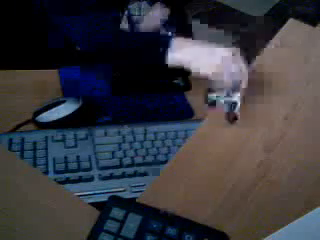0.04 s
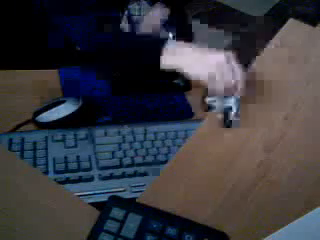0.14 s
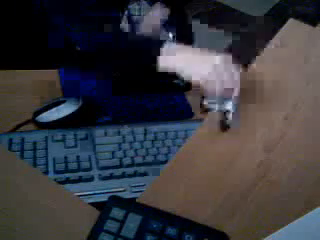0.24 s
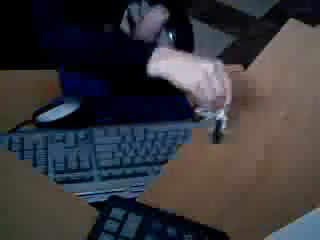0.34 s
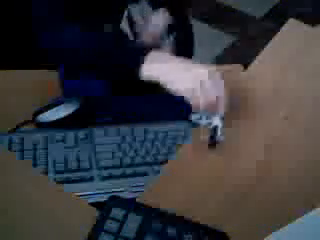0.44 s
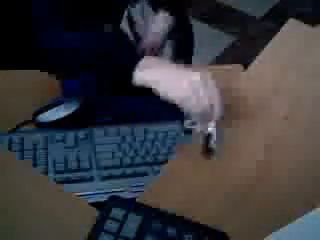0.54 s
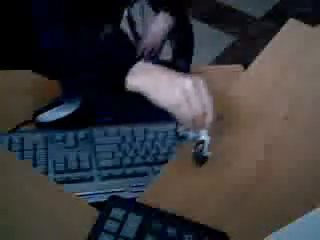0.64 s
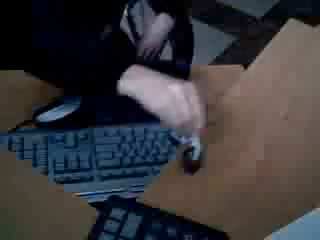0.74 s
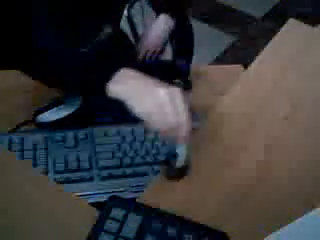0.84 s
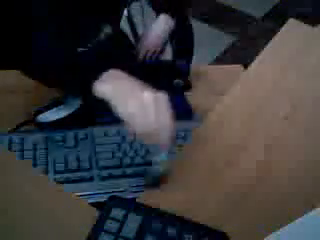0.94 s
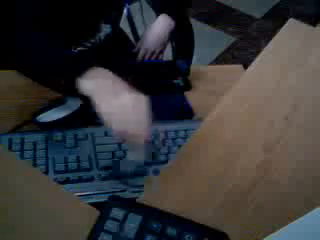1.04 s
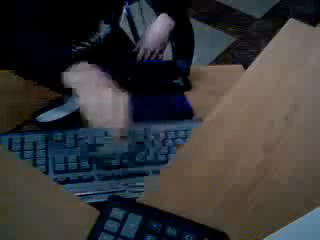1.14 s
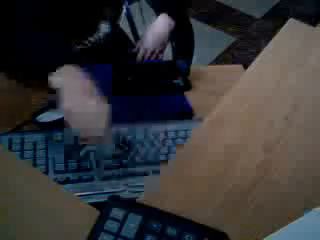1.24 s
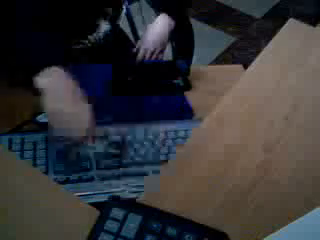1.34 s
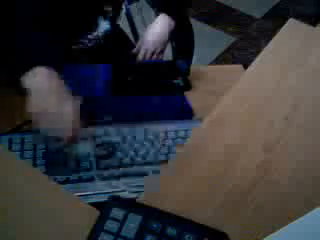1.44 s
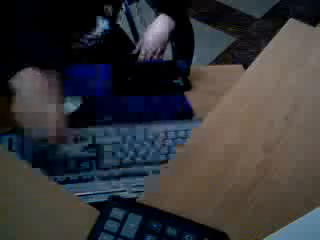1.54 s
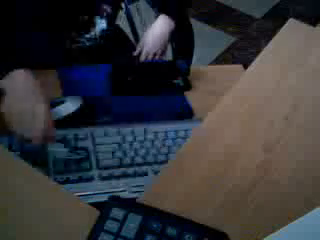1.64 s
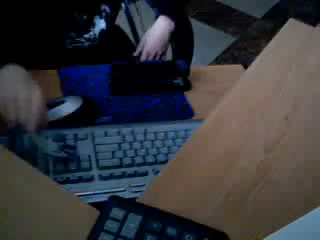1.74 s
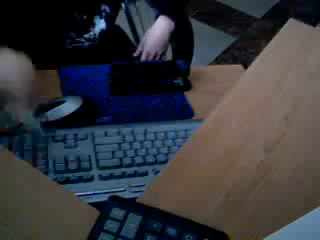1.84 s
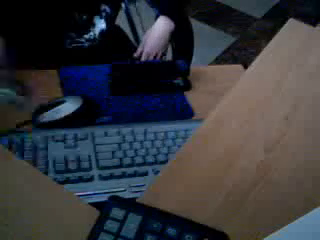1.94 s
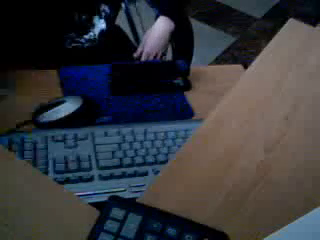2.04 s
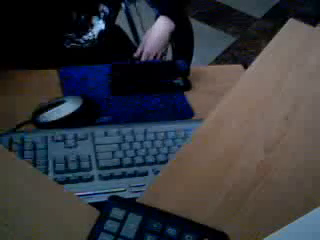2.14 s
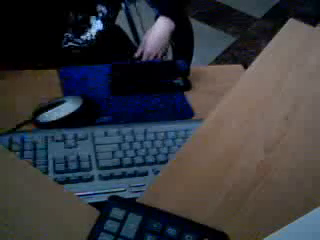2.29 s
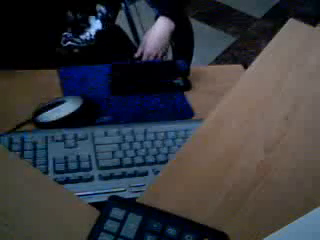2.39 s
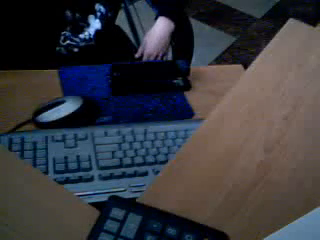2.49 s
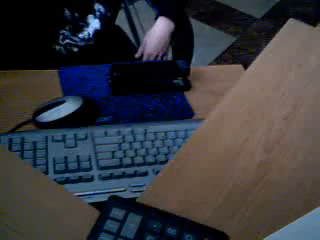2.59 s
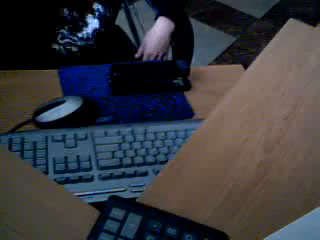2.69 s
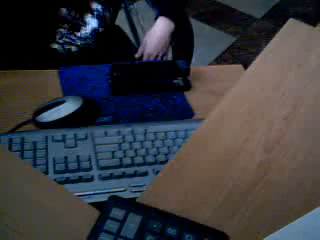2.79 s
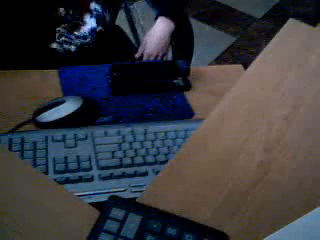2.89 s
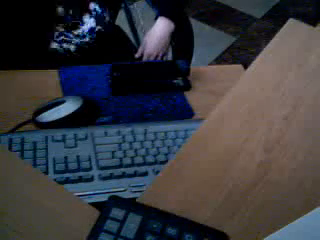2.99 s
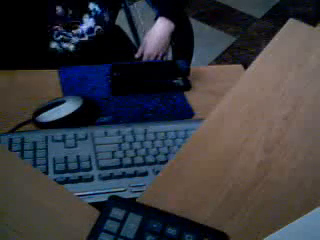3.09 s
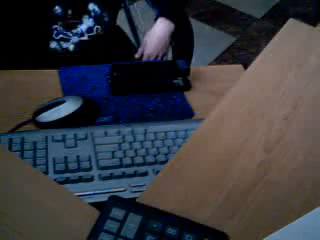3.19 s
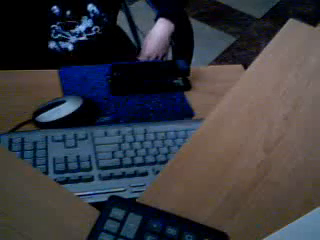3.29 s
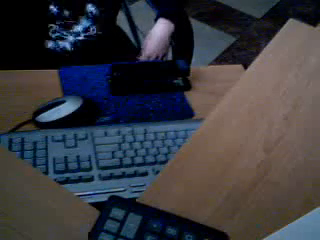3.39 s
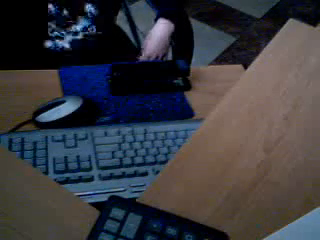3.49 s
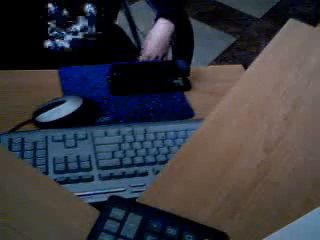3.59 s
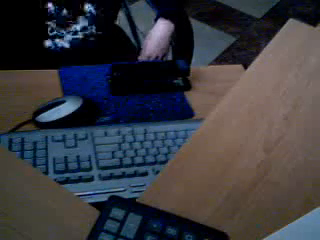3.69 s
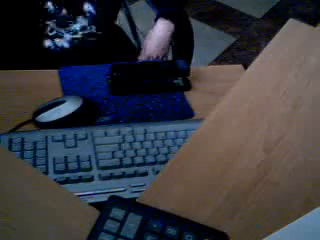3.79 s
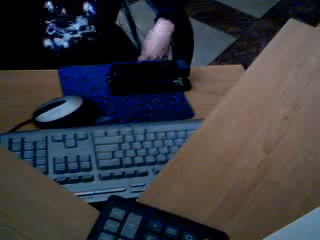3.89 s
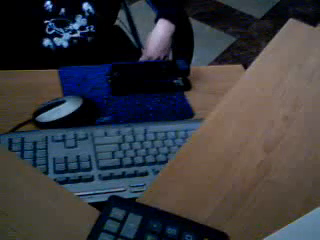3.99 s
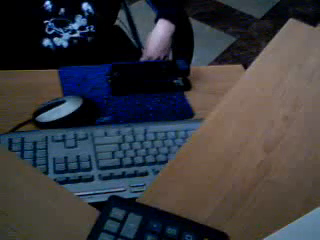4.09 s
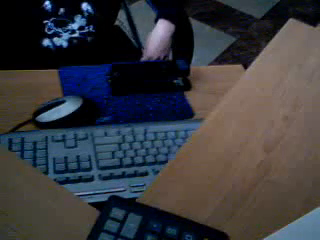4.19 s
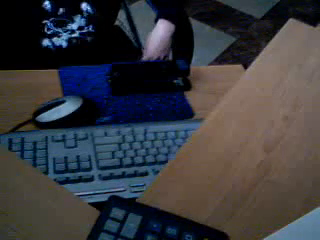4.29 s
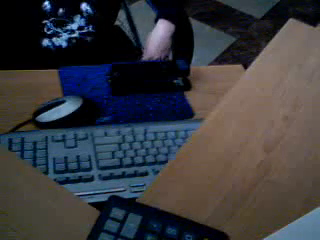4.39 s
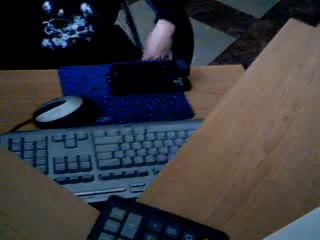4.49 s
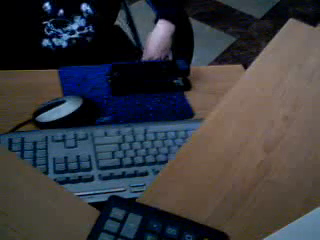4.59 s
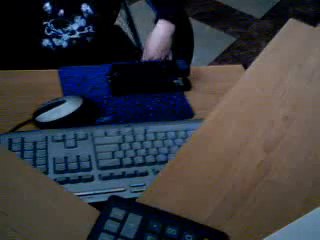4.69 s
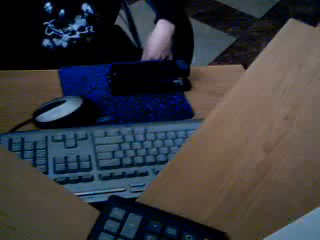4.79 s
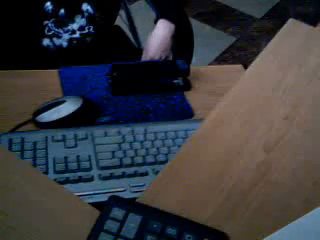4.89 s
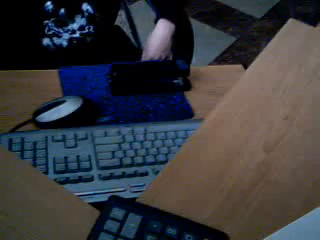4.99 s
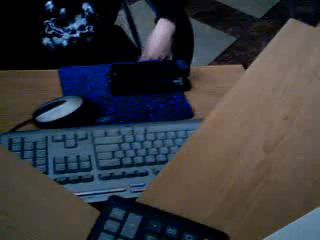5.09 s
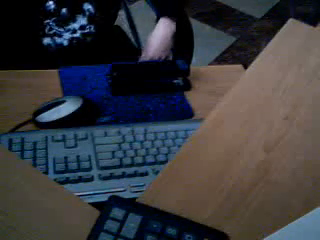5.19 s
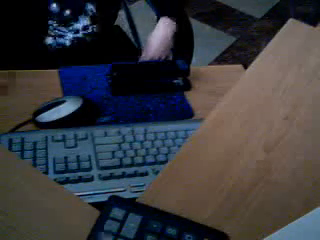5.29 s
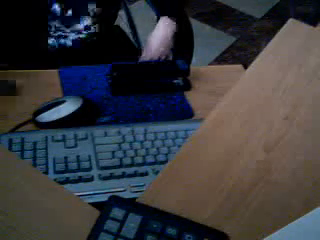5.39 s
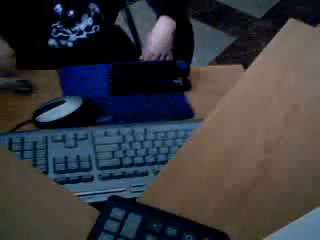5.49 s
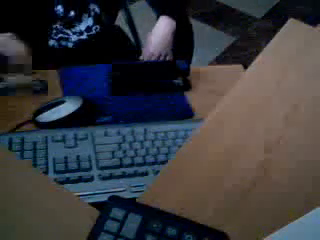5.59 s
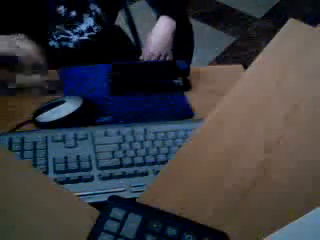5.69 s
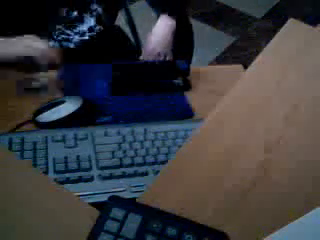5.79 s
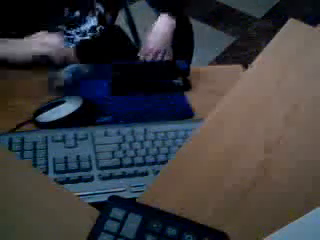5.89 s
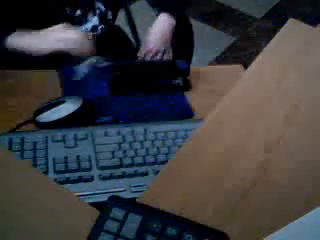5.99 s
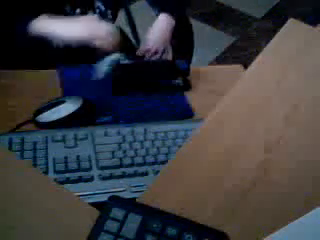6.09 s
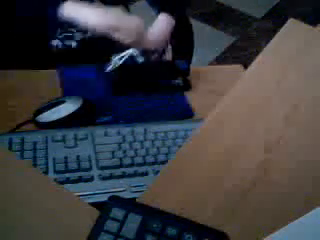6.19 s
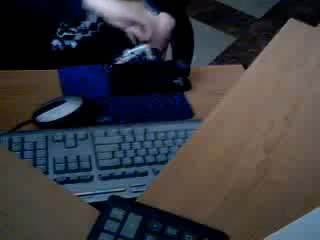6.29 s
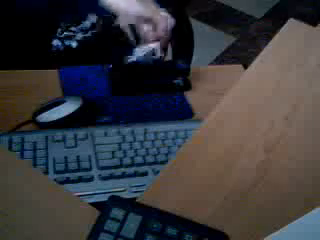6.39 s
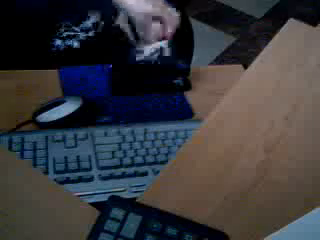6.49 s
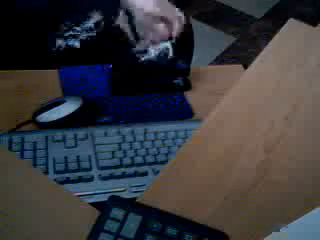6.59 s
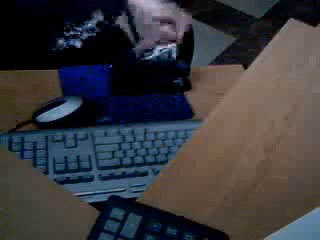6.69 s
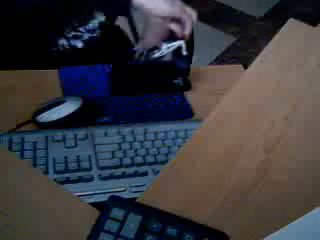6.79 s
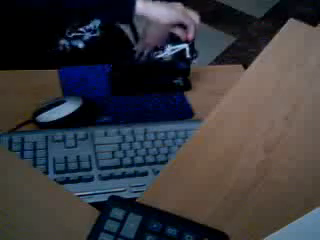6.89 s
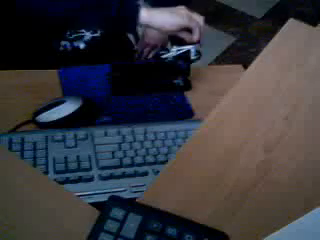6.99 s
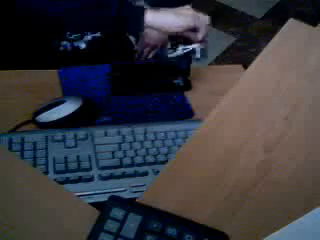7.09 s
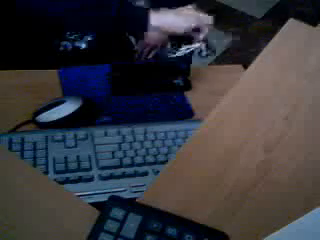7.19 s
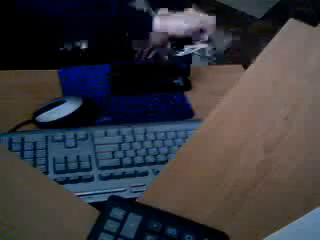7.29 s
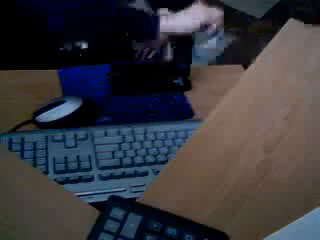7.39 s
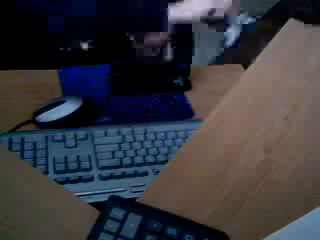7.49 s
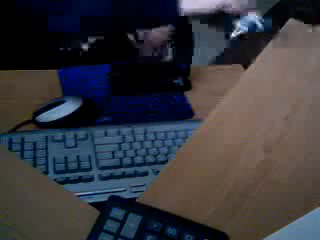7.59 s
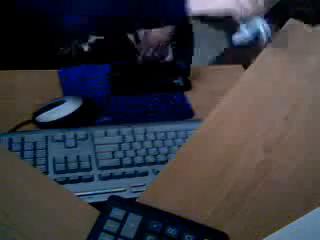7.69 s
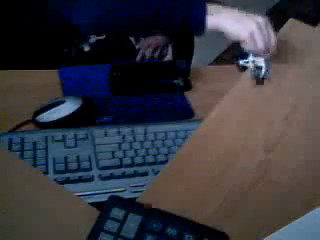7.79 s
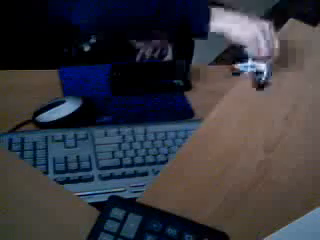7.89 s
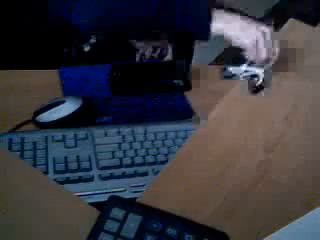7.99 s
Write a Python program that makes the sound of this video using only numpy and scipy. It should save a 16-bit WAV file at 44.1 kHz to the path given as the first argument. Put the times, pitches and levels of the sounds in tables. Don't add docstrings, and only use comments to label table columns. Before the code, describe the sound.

Close on a desk in a small room, steady hiss and low computer hum lie under wheels rasping on wood. Keys clatter briefly, then hard wooden knocks with metal snaps come in irregular bursts, separated by light taps, soft scrapes and low desk shudders. A metal frame pings near the end before one last heavy clack. The treble echoes faintly from a small loudspeaker, and the cheap microphone overloads.

```python
import sys
import numpy as np
from scipy import signal
from scipy.fft import rfft, irfft
from scipy.io import wavfile
from scipy.ndimage import uniform_filter1d

SR = 44100
rng = np.random.default_rng(int(sys.argv[2]) if len(sys.argv) > 2 else 0)


def field_ratio(decibels):
    return 10 ** (np.asarray(decibels, dtype=float) / 20)


def log_audio(samples):
    frames = np.atleast_2d(samples).T
    limited = np.clip(frames, -1, 1)
    pcm = np.round(limited * 32767).astype(np.int16)
    wavfile.write(sys.argv[1], SR, pcm)


N = 355005

# pitch_hz, width_hz (wider dies faster), level_db
DESK_MODES = [(306, 39, 9), (405.5, 10, 10.5), (496, 18, 4.5), (656, 46, 5), (764, 140, -6), (852, 180, 3),
              (1020, 60, 3), (1210, 48, 6), (1369, 30, 0.5), (1600, 27, -14), (1620, 27, -34),
              (1810, 80, -27.5), (1890, 90, -32.5)]


def evened(x):
    return x / np.sqrt(np.mean(x ** 2) + 1e-20)


def peaked(x, db):
    return field_ratio(db) * x / np.sqrt(uniform_filter1d(x ** 2, size=130).max())


def add(mix, start_s, sound):
    part = mix[round(start_s * SR):][:len(sound)]
    part += sound[:len(part)]


def resonate(x, hz, width_hz):
    pole = np.exp((2j * np.pi * hz - np.pi * width_hz) / SR)
    return 2 * signal.lfilter([1 - abs(pole)], [1, -pole], x).real


def resonate_twice(x, hz, width_hz):
    return resonate(resonate(x, hz, width_hz), hz, width_hz)


def band(x, lo_hz, hi_hz):
    return signal.sosfilt(signal.butter(3, [lo_hz, hi_hz], "band", fs=SR, output="sos"), x)


def coloured(points):
    hz, db = np.transpose(points)
    shape_db = np.interp(np.log(np.fft.rfftfreq(N, 1 / SR) + 1), np.log(hz + 1), db)
    return evened(irfft(rfft(rng.standard_normal(N)) * field_ratio(shape_db), N))


def background():
    # pitch_hz, level_db (per Hz)
    hiss_colour = [(150, 5), (300, -5.5), (600, 3.5), (1400, 4), (1900, -0.5), (3000, -2), (4000, -0.5),
                   (4900, 1.5), (5600, -1.5), (7050, 0), (7300, -7.5), (8300, -7.5)]
    # pitch_hz, level_db (per Hz)
    drone_colour = [(10, -3), (25, -1), (40, -4), (70, -0.5), (95, -18.5), (150, -7), (250, -27.5),
                    (400, -35)]
    # pitch_hz, width_hz, level_db
    fan_tones = [(54.9, 5.1, -49.5), (125, 5.4, -51.5), (205, 14, -54.5)]
    hum = np.zeros(N)
    for hz, width_hz, db in fan_tones:
        hum += field_ratio(db) * evened(resonate(rng.standard_normal(N), hz, width_hz))
    return field_ratio(-48) * coloured(hiss_colour) + field_ratio(-47.5) * coloured(drone_colour) + hum


def jingle():
    # time_s, level_db
    jingle_course = [
        (2.1, -76),
        (2.25, -53),
        (2.35, -54),
        (2.5, -52.5),
        (2.75, -63),
        (2.95, -53),
        (3.1, -57),
        (3.35, -62),
        (3.5, -85),
    ]
    time_s, db = np.transpose(jingle_course)
    contacts = rng.standard_normal(N) * (rng.random(N) < 600 / SR)
    ring = evened(resonate_twice(contacts, 4700, 700))
    return ring * field_ratio(np.interp(np.arange(N) / SR, time_s, db))


def strokes(rows, rest_db):
    gain = np.full(N, field_ratio(rest_db))
    for start_s, length_s, db in rows:
        progress = np.arange(0, 1, 1 / (length_s * SR))
        add(gain, start_s, field_ratio(db) * np.sin(np.pi * progress ** 0.58) ** 2)
    return gain


def shudder():
    # start_s, length_s, level_db
    nudges = [(.2, 0.21, -37), (.5, .14, -35), (.7, .28, -31.5), (1.2, .1, -40), (1.42, .13, -35.5),
              (2.02, .11, -36), (2.3, 0.21, -39.5), (2.58, 0.19, -42), (2.9, 0.3, -38), (3.13, 0.13, -31.5),
              (3.27, 0.4, -41), (3.68, 0.35, -36.5), (4.38, 0.33, -40.5), (4.8, 0.43, -43),
              (5.23, 0.15, -27.5), (5.82, 0.24, -32), (6.02, 0.23, -32), (6.31, .07, -42), (6.62, .2, -33),
              (7.11, .15, -39), (7.75, .12, -20.5), (7.95, 0.13, -34.5)]
    sway = evened(resonate_twice(rng.standard_normal(N), 131.0, 42))
    return sway * field_ratio(-9.0) * strokes(nudges, -50)


def rolling():
    # time_s, level_db
    roll_pressure = [
        (0.0, -45),
        (0.08, -51),
        (0.25, -46),
        (0.45, -42),
        (0.65, -34),
        (0.72, -37.5),
        (0.77, -47),
        (0.95, -41),
        (1.06, -65),
    ]
    # start_s, length_s, rasp_db, rumble_db (relative to the rasp)
    slides = [(.74, .2, -53, 14), (1.236, 0.19, -42.5, -7), (1.449, 0.33, -48, -7),
              (2.053, 0.48, -49.5, -15), (2.3, 0.35, -46, -2), (2.507, 0.28, -49, -6.5),
              (2.788, 0.48, -49, -5), (3.114, 0.27, -50.5, -3.5), (3.473, 0.19, -50.5, 10),
              (3.8, 0.4, -61, 9.5), (4.36, 0.34, -50, 2), (4.616, 0.6, -61.5, 8.5),
              (5.255, 0.23, -36.5, -7), (5.696, 0.42, -57.5, -4), (6.281, 0.15, -53.5, -6),
              (6.605, 0.26, -52.5, -1), (6.898, 0.19, -58, -2), (7.746, 0.13, -47, -4),
              (7.86, 0.29, -40.5, -1)]
    # pitch_hz, level_db
    rumble_colour = [(120, -9.5), (180, -2.5), (220, 9), (300, -2.5), (405, 2.5), (500, -2.5), (650, -7),
                     (1000, -70)]
    time_s, pressure_db = np.transpose(roll_pressure)
    roll = field_ratio(np.interp(np.arange(N) / SR, time_s, pressure_db, right=-120))
    rasp_rows = [row[:3] for row in slides]
    rumble_rows = [(s, length_s, db + rumble_db) for s, length_s, db, rumble_db in slides]
    rasp_gain = roll + strokes(rasp_rows, -54.5)
    rumble_gain = roll * field_ratio(2.5) + strokes(rumble_rows, -55)

    rumble_lumps, rasp_lumps = [evened(band(rng.standard_normal(N), 8.8, 45)) for _ in range(2)]
    grain_size = field_ratio(2.0 * np.minimum(rng.exponential(1, N), 2.5))
    grit = rng.standard_normal(N) * grain_size * (rng.random(N) < 4000 / SR)
    wood = np.zeros(N)
    for hz, width_hz, db in DESK_MODES[3:]:
        wood += field_ratio(db) * resonate(grit, hz, 1.35 * width_hz)
    rasp = evened(band(wood, 495, 1634)) * field_ratio(0.66 * rasp_lumps) * rasp_gain
    rumble = coloured(rumble_colour) * field_ratio(1.8 * rumble_lumps) * rumble_gain
    return rumble + rasp


def ping(start_s, db, other_db):
    # pitch_hz, level_db, fade_s (time to fall by 60 dB)
    frame_modes = [(1200, 5, .025), (2560, 4, .05), (3930, -17, .25), (4253, -5, .3), (4753, -2.5, .19),
                   (4795, -10, .36), (4853, -12, .25), (4904, -11, .24), (5023, -7, .26), (5710, 1, .035),
                   (6090, -2, .05), (6920, -6, .07), (7600, -10, .09)]
    t = np.arange(SR // 2) / SR
    ring = np.zeros(len(t))
    for i, (hz, mode_db, fade_s) in enumerate(frame_modes):
        start_db = mode_db + other_db * (i != 4)
        ring += field_ratio(start_db - 60 * t / fade_s) * np.sin(2 * np.pi * (hz * t + rng.random()))
    return start_s, peaked(ring * np.minimum(t / 0.001, 1), db)


def frame_pings():
    # start_s, peak_db, other_db (the other tones relative to the main one)
    flicks = [
        (6.63, -32.5, -16),
        (7.154, -19.5, 0),
    ]
    frame = np.zeros(N)
    for row in flicks:
        add(frame, *ping(*row))
    return frame


def tick(start_s, db, bright_db, middle_db, middle_hz, fade_s):
    t = np.arange(SR // 2) / SR
    noise = rng.standard_normal(len(t)) * np.minimum(t / 0.0032, 1)
    snap = noise * field_ratio(-60 * t / 0.051)
    tail = noise * field_ratio(-60 * t / max(fade_s, .01))
    rattle = resonate_twice(snap + .3 * tail, 4850, 600)
    wide = snap + 0.28 * tail
    bright = band(wide, 6130, 7620)
    middle = band(0.2 * wide + resonate(wide, middle_hz, 370), 1800, 4400)
    sound = peaked(rattle, db) + peaked(bright, db + bright_db) + peaked(middle, db + middle_db)
    return start_s - .002, sound


def metal_ticks():
    # start_s, peak_db, bright_db, middle_db (both relative to the peak)
    key_rattles = [
        (0.82, -38, -7, 0.5),
        (1.1977, -34, 3, -4.5),
        (1.2125, -31.5, -3, -3.5),
        (1.293, -39, -7, -1.5),
    ]
    frame_snaps = [
        (2.017, -25, -15, -26),
        (2.0706, -32.5, -14, -2),
        (2.102, -39, -9, -15),
        (3.5191, -24.5, -12, -9.5),
        (5.2446, -35.5, 0, 7.5),
        (5.2608, -31.5, -9.5, -13),
        (6.1374, -51, -6, 3),
        (7.1553, -34, 7, -4),
        (7.7662, -30, -12, 0.5),
        (7.8166, -46, -16, -9.5),
    ]
    small_parts = [(1.5474, -46, -7, -3), (1.984, -57, 1, 3), (2.3266, -43.5, -7, -1), (2.87, -49, -7, -10),
                   (2.9592, -52, 0, -2), (3.4425, -40, -26, -20), (3.9812, -44, -20, 3.5),
                   (4.3855, -46.5, -9, -10), (6.0394, -46, -26, -3), (6.631, -41, 0, -9),
                   (6.6644, -47, -4, -8)]
    ticks = np.zeros(N)
    for rows, middle_hz, fade_s in [(key_rattles, 3610, 0.32), (frame_snaps, 2540, .12), (small_parts, 4080, 0.13)]:
        for row in rows:
            add(ticks, *tick(*row, middle_hz, fade_s))
    return ticks


def knock(start_s, db, hz, thump_db, chatter_s, focus_db):
    t = np.arange(SR // 5) / SR
    press = np.minimum(t / 0.0018, 1) * np.exp(-(t / max(chatter_s, .002)) ** 4)
    contact = rng.standard_normal(len(t)) * press
    wood = peaked(resonate(contact, hz, 69), focus_db)
    for mode_hz, width_hz, mode_db in DESK_MODES[2:]:
        octaves_away = abs(np.log2(mode_hz / hz))
        wood += peaked(resonate(contact, mode_hz, width_hz + 40), mode_db - 4 * octaves_away)
    late = np.roll(contact, round(.006 * SR))
    thump = np.zeros(len(t))
    for mode_hz, width_hz, mode_db in [(156.7, 23, -17.0), (239.0, 14, 3.0)] + DESK_MODES[:3]:
        thump += peaked(resonate(late, mode_hz, width_hz + 30), mode_db)
    sound = peaked(band(wood, 572, 1670), db) + peaked(band(thump, 66, 390), db + thump_db)
    return start_s - .003, sound


def wheel_knocks():
    # start_s, peak_db, ring_hz, thump_db (relative to peak), focus_db (how far the ring stands out)
    landings = [(0.825, -26, 820, 6.5, -5), (0.867, -28.5, 1380, 1, -6), (0.907, -34, 1130, 6, 1),
                (1.2035, -23, 1134, -12, 8), (1.296, -30.5, 1100, -19, 1), (2.018, -11.5, 1020, -8, -1),
                (2.067, -5.5, 1457, -5.5, 9), (2.077, -8, 1357, -6.5, 3), (2.098, -15, 1400, -10, 3),
                (3.4385, -23, 1210, -7, -9), (3.518, -11.5, 1540, -7, 17), (3.988, -32, 1530, -2.5, 13),
                (4.387, -26, 1100, -1, 5), (5.245, -10.5, 1130, -14.5, -4), (5.263, -14, 1310, -4.5, 1),
                (7.7675, -4, 1124, -10.5, 12), (7.779, -7.5, 740, -1, 14), (7.814, -20, 1160, -12, 1)]
    # start_s, peak_db, ring_hz, thump_db (relative to peak)
    taps = [(0.152, -42, 622, 2), (0.514, -37, 910, -18), (0.782, -51, 940, 21), (1.505, -35, 605, -4),
            (1.739, -43, 836, -13), (2.342, -33, 1250, -15), (2.414, -34.5, 1020, 1), (2.523, -43, 861, -1),
            (3.02, -38.5, 920, 6), (3.165, -43, 840, -9), (4.009, -36, 1520, -3), (5.869, -43, 1210, -3),
            (6.038, -38.5, 1090, -20), (6.058, -39.5, 860, -13), (6.139, -37.5, 760, -21),
            (6.157, -40.5, 821, -14), (6.305, -45, 660, -9), (6.636, -43.5, 1050, -14),
            (7.156, -35, 1330, -20)]
    knocks = np.zeros(N)
    for *hit, focus_db in landings:
        add(knocks, *knock(*hit, .016 - .0002 * focus_db, focus_db))
    for row in taps:
        add(knocks, *knock(*row, chatter_s=0.013, focus_db=17))
    return knocks


def room(x):
    # pitch_hz, fade_s (time to fall by 60 dB)
    room_fade = [(150, 0.38), (500, 0.52), (1300, 0.39), (2500, 0.36), (5000, 0.36), (8000, 0.43)]
    reflections = np.zeros(SR)
    at = np.arange(400, SR - 20, 20)
    reflections[at + rng.integers(0, 20, len(at))] = rng.choice([-1., 1.], len(at))
    hz, t, z = signal.stft(reflections, SR, nperseg=256)
    fade_hz, fade_s = np.transpose(room_fade)
    dying = field_ratio(-60 * t / np.interp(hz, fade_hz, fade_s)[:, None])
    tail = signal.istft(z * dying, SR, nperseg=256)[1]
    return signal.fftconvolve(x, tail / np.linalg.norm(tail))[:N]


def add_loudspeaker(heard):
    # delay_s, pitch_hz, width_hz, level_db
    speaker_trip = (.2245, 4800, 800, -15)
    delay_s, hz, width_hz, db = speaker_trip
    once = field_ratio(db) * resonate_twice(heard, hz, width_hz)
    add(heard, delay_s, once)
    add(heard, 2 * delay_s, field_ratio(db + 4.5) * resonate(once, hz, width_hz))


def smear(x):
    # low_hz, high_hz
    wash_bands = [(2300, 4000), (4000, 5500), (5500, 8000)]
    size = round(.012 * SR)
    wash = np.zeros(N)
    for lo_hz, hi_hz in wash_bands:
        power = uniform_filter1d(band(x, lo_hz, hi_hz) ** 2, size=size)
        ahead = np.roll(power, -size // 3)
        wash += np.sqrt(abs(ahead)) * evened(band(rng.standard_normal(N), lo_hz, hi_hz))
    return field_ratio(-15) * wash


def scene():
    bike = wheel_knocks() + metal_ticks()
    frame = frame_pings()
    heard = bike + frame + field_ratio(-9) * room(bike + field_ratio(-7) * frame)
    add_loudspeaker(heard)
    return (heard + rolling() + shudder() + background() + jingle())[None]


def roll_off(x):
    return signal.sosfilt(signal.butter(12, 11500, fs=SR, output="sos"), x)


def record(dry):
    ceiling, offset = .705, -.015
    dull = signal.firwin(511, 8200, window=("kaiser", 9), fs=SR)[None]
    narrow = signal.oaconvolve(dry + smear(dry[0]), dull, "same")
    clipped = np.clip(narrow, -ceiling, ceiling) + offset
    gentle = signal.firwin(41, 10000, window=("kaiser", 9), fs=SR)[None]
    mix = signal.oaconvolve(clipped, gentle, "same")
    return roll_off(mix)


dry = scene()
out = record(dry)
log_audio(out)
```